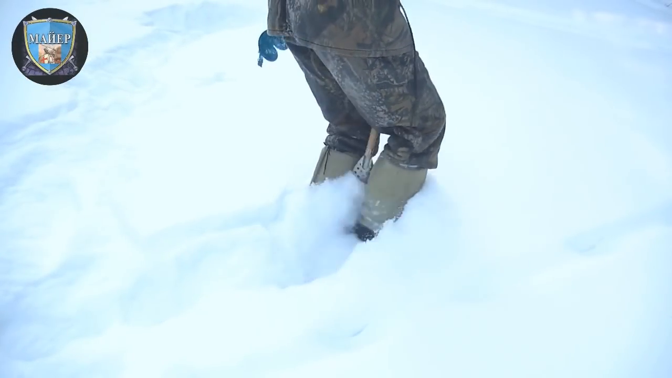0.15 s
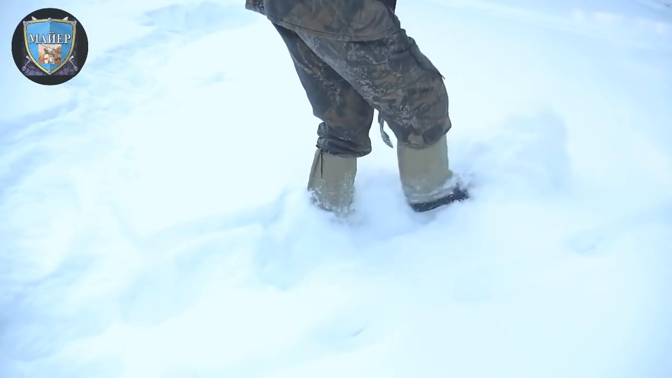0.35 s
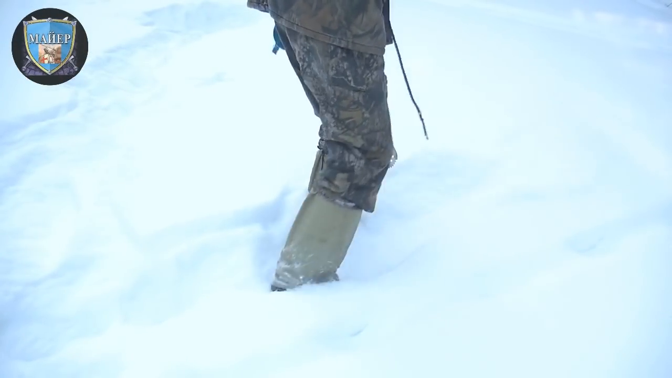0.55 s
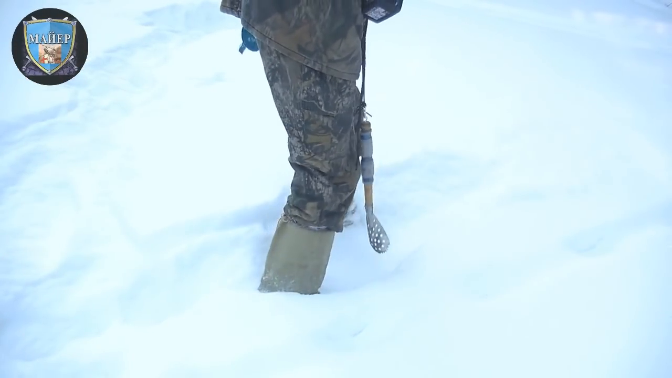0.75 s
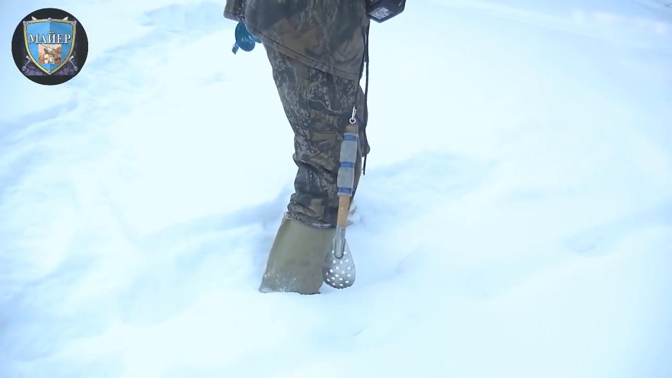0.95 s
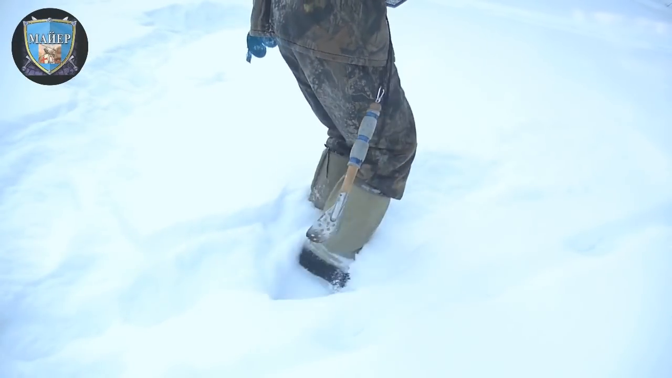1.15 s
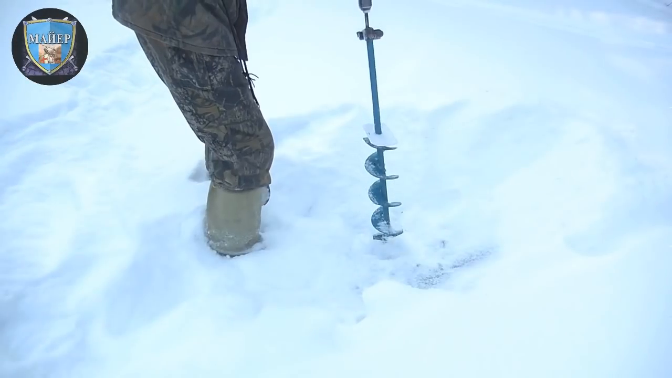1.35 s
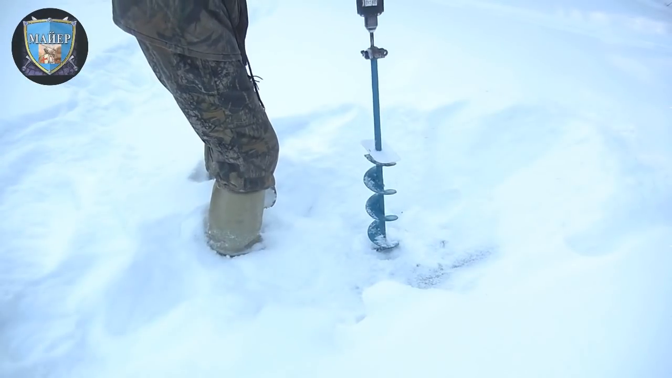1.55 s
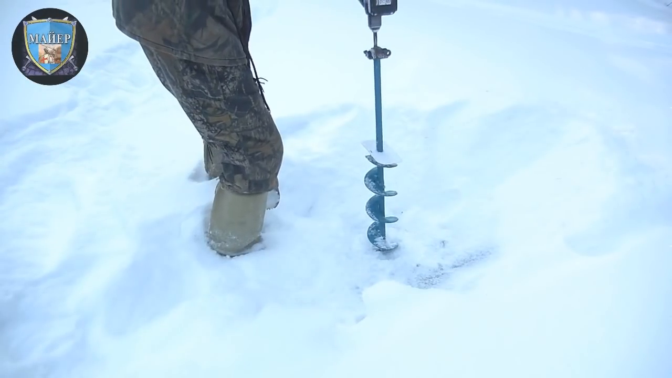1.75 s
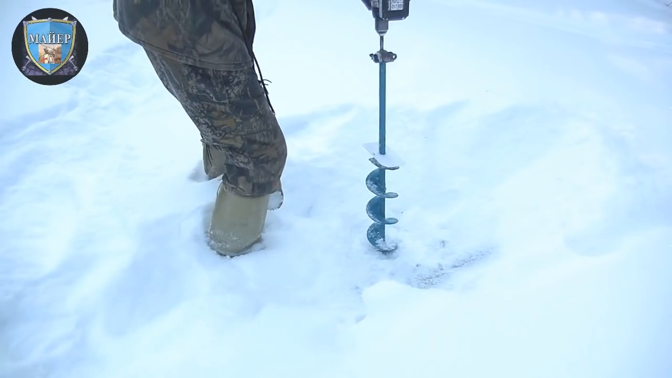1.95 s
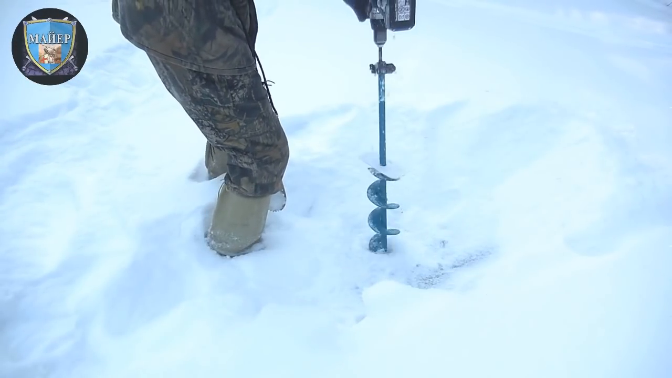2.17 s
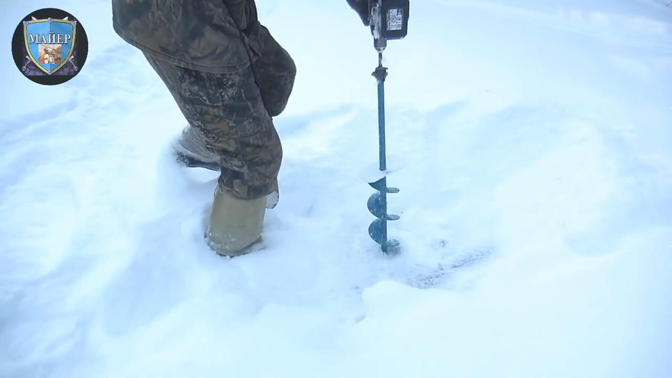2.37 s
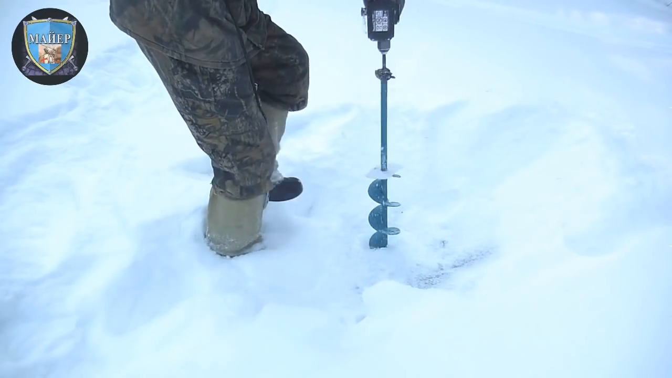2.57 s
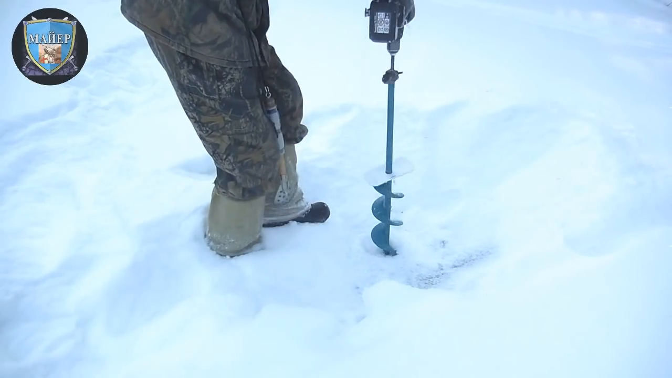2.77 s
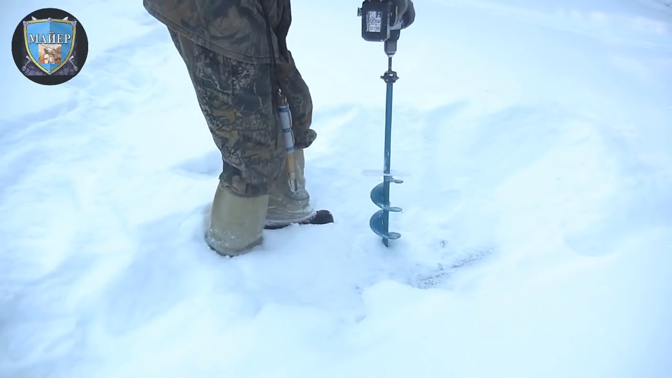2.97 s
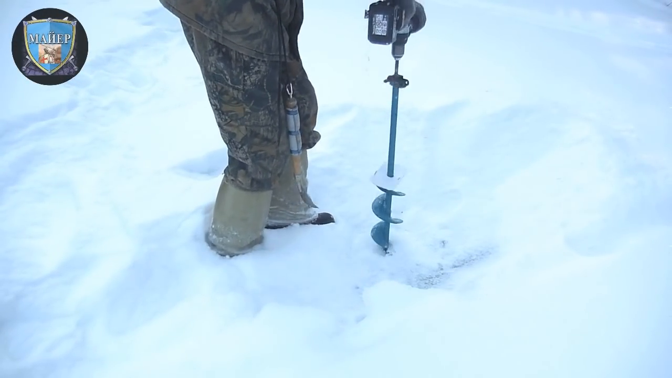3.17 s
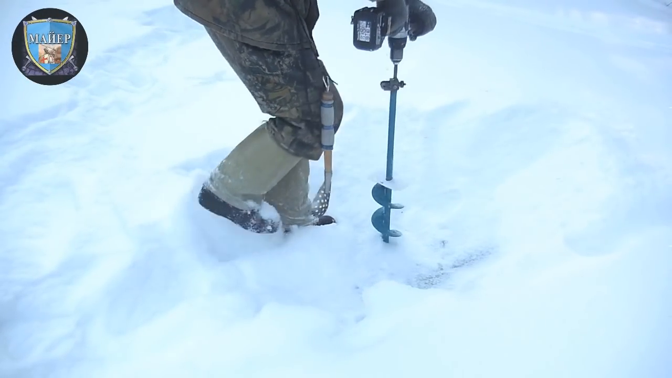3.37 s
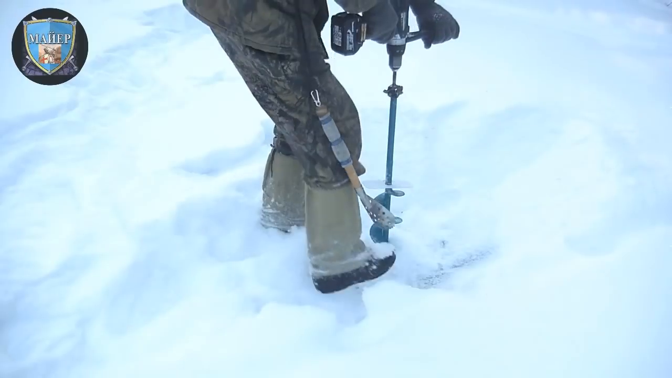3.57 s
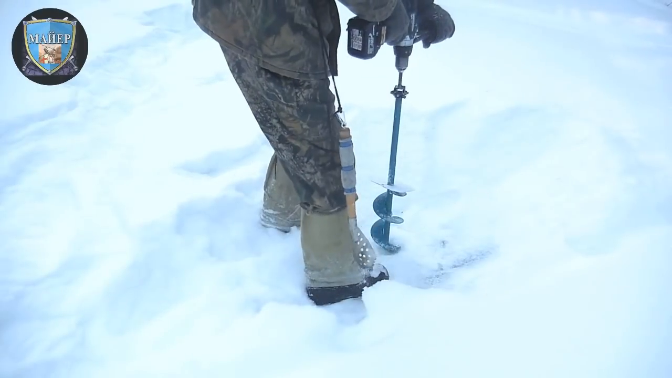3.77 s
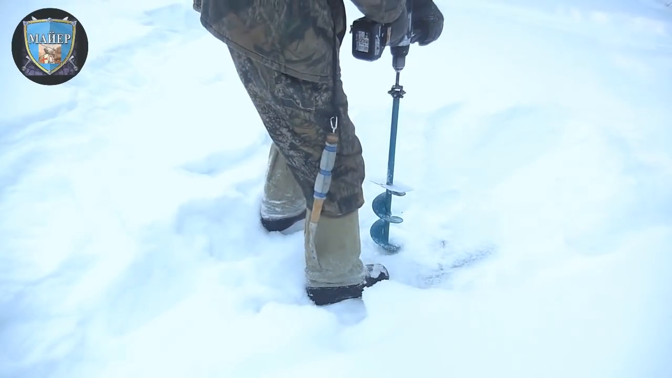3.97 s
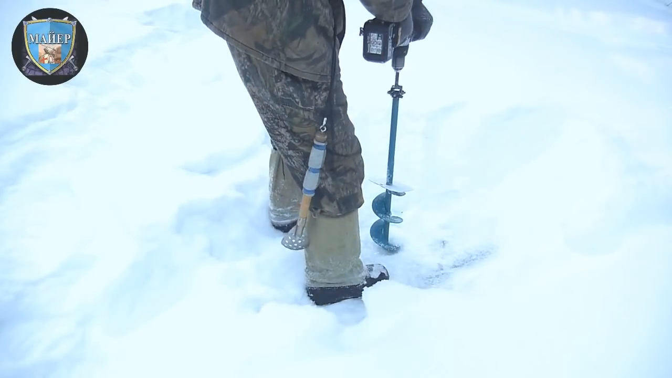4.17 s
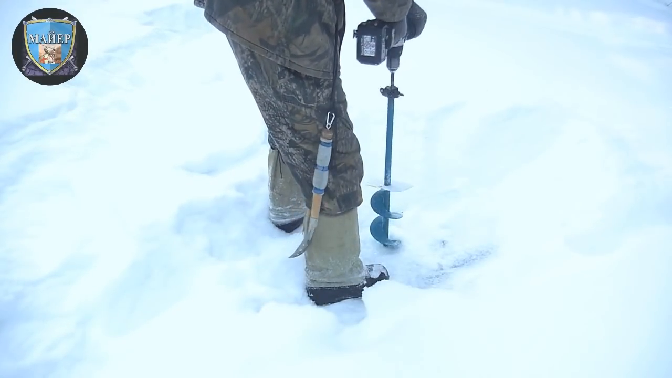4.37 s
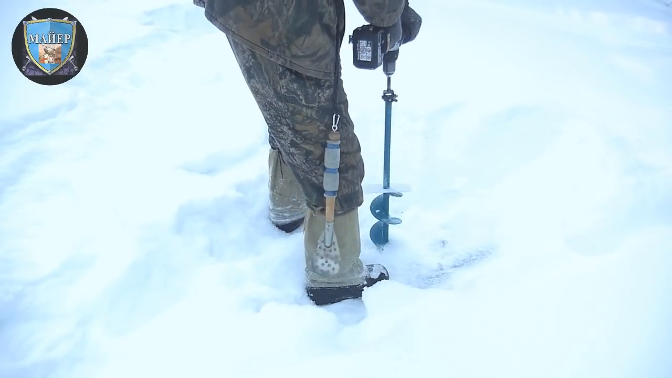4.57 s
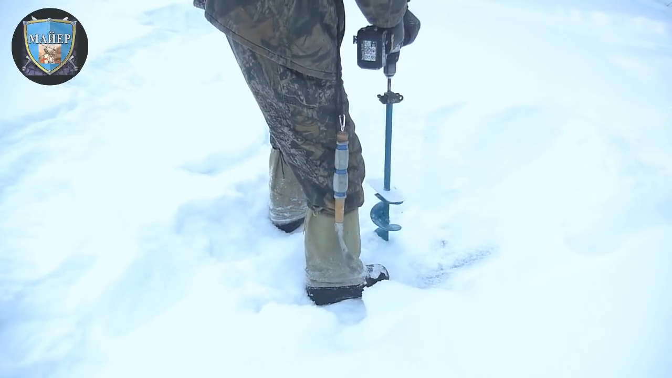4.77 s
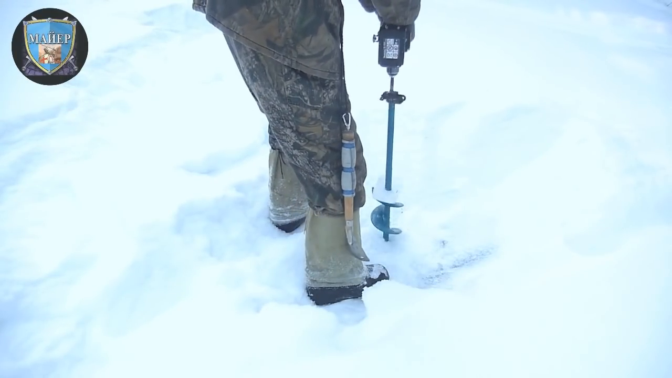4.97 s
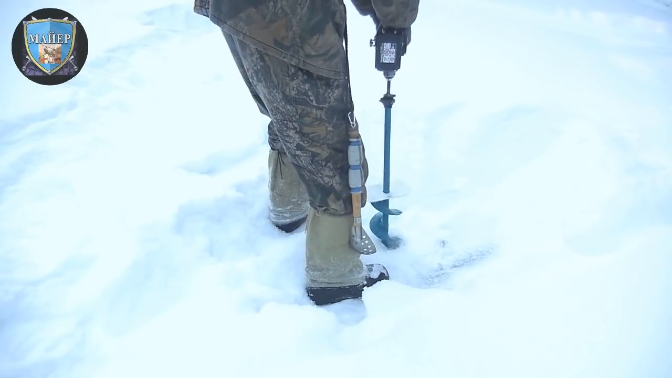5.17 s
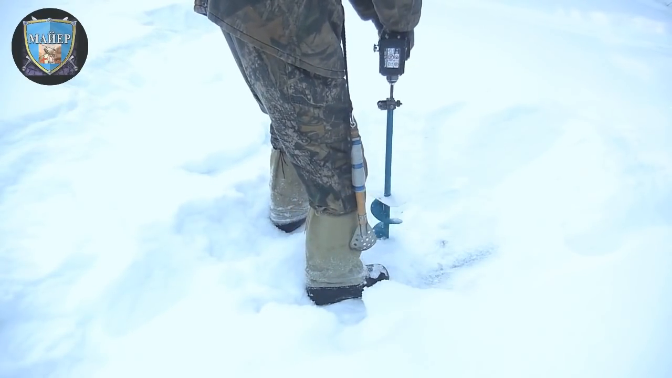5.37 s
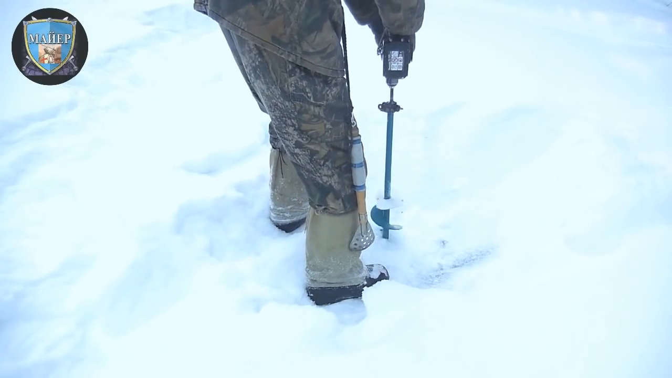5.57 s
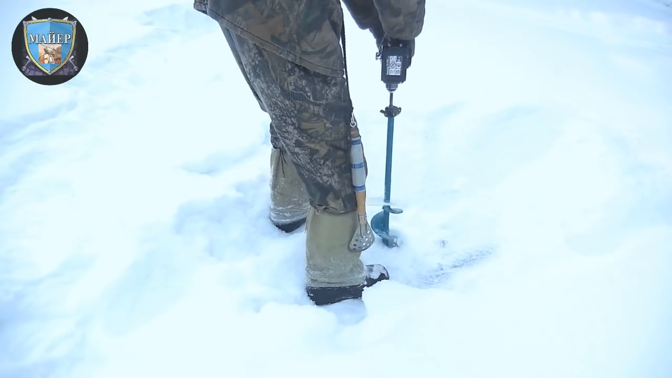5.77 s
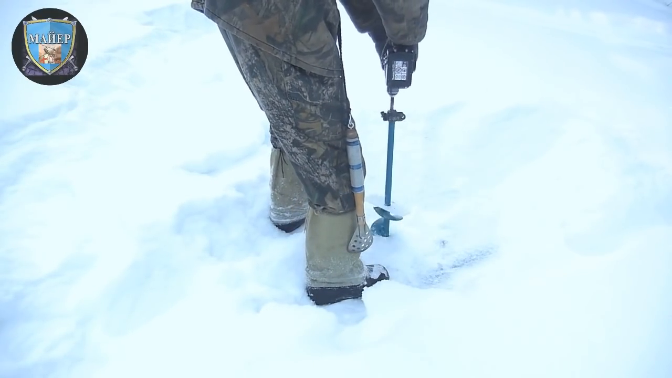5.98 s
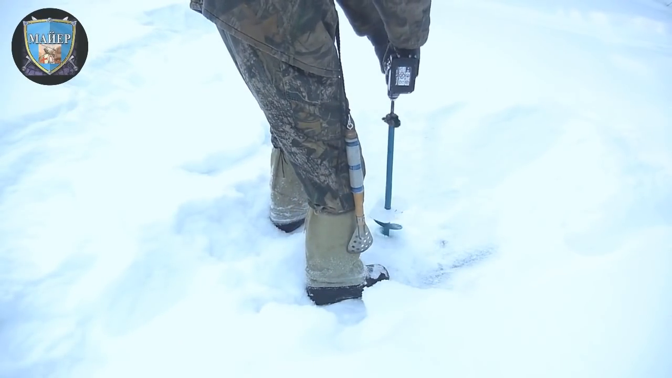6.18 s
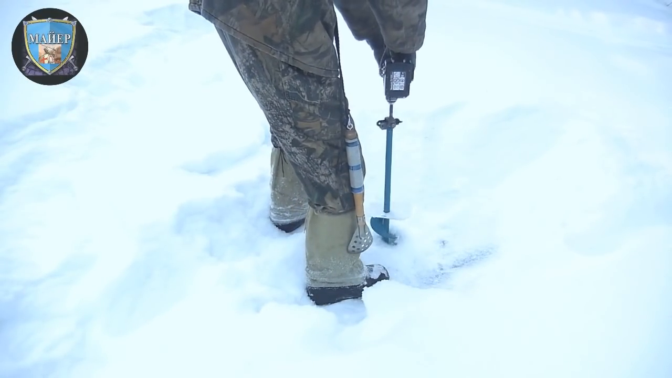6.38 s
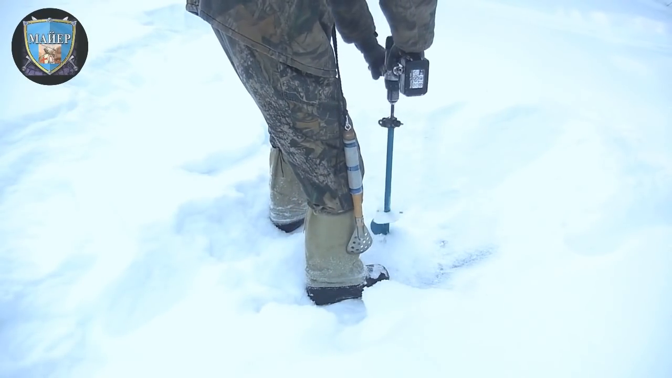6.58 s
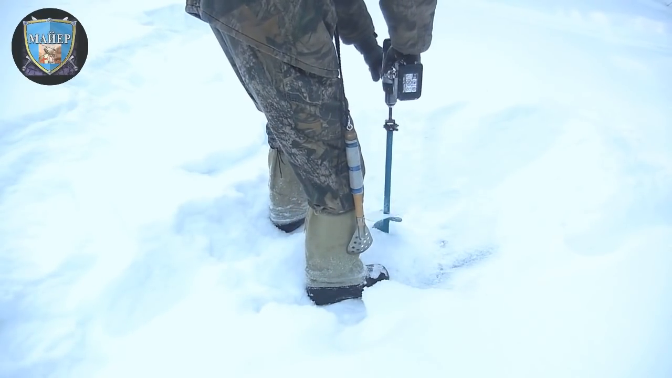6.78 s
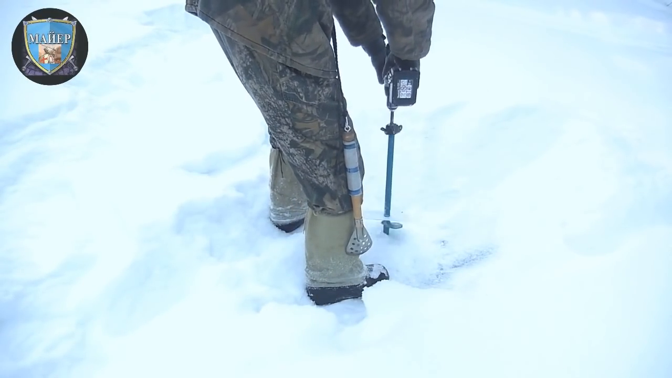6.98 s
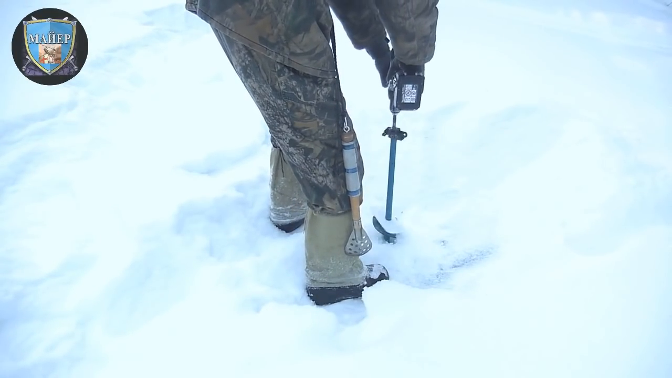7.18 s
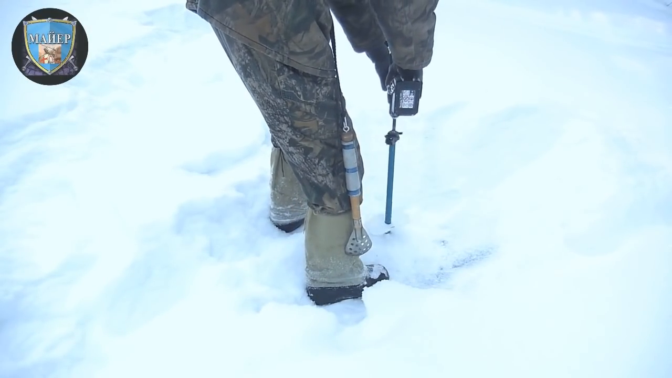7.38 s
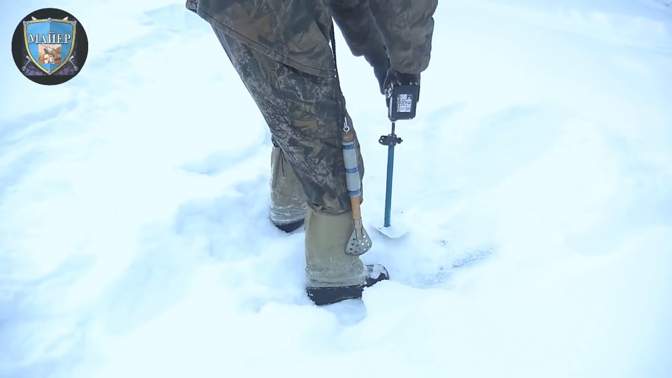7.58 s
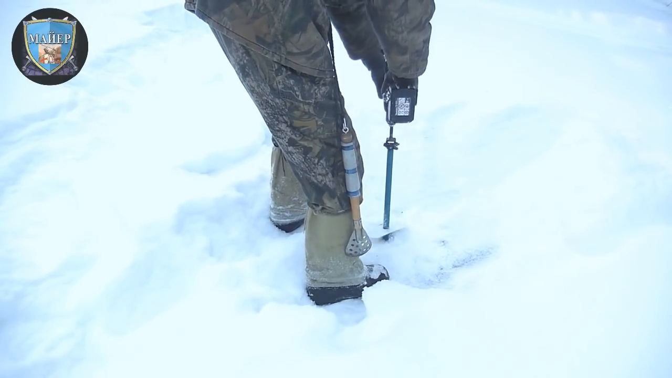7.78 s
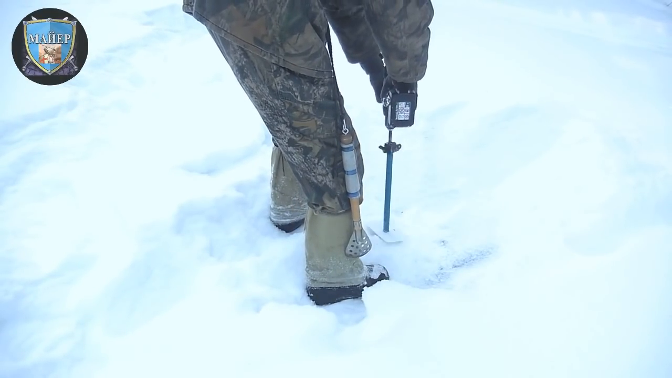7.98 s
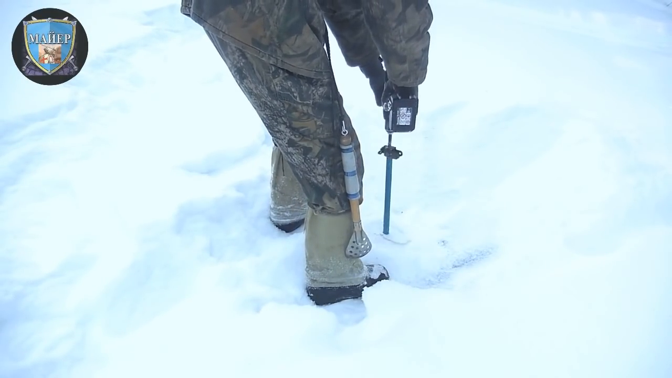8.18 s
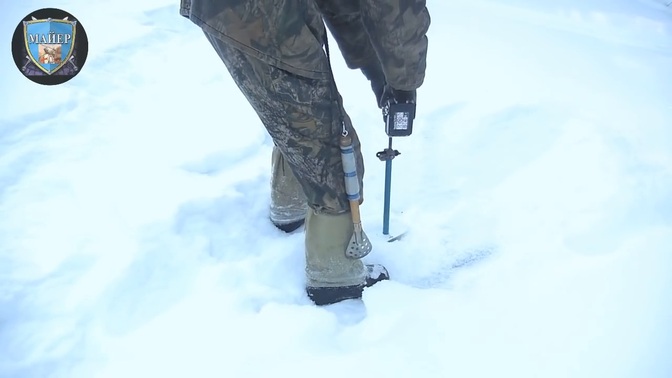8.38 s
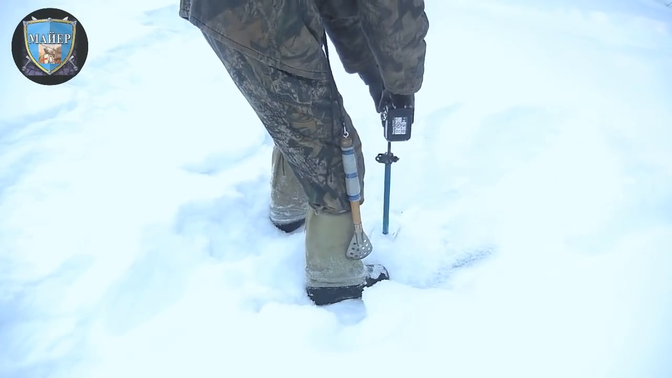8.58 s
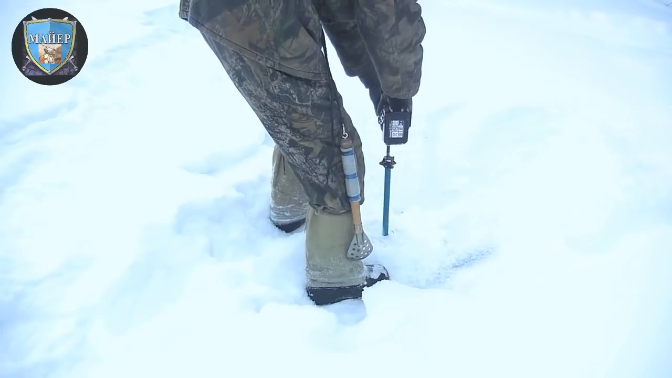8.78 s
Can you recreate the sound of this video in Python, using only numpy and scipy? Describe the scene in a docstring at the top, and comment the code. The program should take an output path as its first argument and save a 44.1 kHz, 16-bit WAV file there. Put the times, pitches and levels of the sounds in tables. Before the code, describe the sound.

Close by on a frozen lake, in stereo and with no echo, boots wade through soft snow and tackle clinks once. An ice auger on a cordless drill then cuts in two runs, one short and one long, split by a few crunching steps. Motor whine mixes with rough scraping, brief squeals, dry knocks, rattling steel and a hissing spray of ice. Toward the end the cutting smooths out and loose shavings churn with a deepening hollow note.

```python
"""An ice auger, driven by a cordless drill, bores twice into a frozen lake. Its blades chatter and squeal
on the ice and ring the steel spiral, chips spray, the motor whines, and loose shavings churn with a
hollow note that sinks as the hole deepens. Before that, a man wades a few steps through deep snow,
his tackle clinks and he sets the auger down. All is close by, in stereo, in open air with no echo."""
import sys
import numpy as np
from scipy import signal
from scipy.fft import rfft, irfft, next_fast_len
from scipy.io import wavfile
from scipy.ndimage import uniform_filter1d

SR = 44100
rng = np.random.default_rng(int(sys.argv[2]) if len(sys.argv) > 2 else 0)


def to_wav(sig):
    """Store sig (one row per channel, or 1-D mono) as 16-bit WAV at the path in sys.argv[1].

    Samples outside -1..1 are clipped; the rate is SR.
    """
    pcm = np.clip(np.atleast_2d(sig), -1, 1) * 32767
    pcm = np.round(pcm).astype(np.int16)
    wavfile.write(sys.argv[1], SR, pcm.T)  # frames by channels


N = 389844
TIME = np.arange(N) / SR
FFT_SIZE = next_fast_len(N, True)
FREQ = np.fft.rfftfreq(FFT_SIZE, 1 / SR) + 1e-3
FULL_LOAD_DB, FULL_CHIPS_DB = -30, -26
# The bright hiss of fine snow and cracking crust. Each row: frequency in Hz, level in dB.
POWDER_TONE = [(150, -55), (2000, -5), (4500, -2), (7000, 1.5), (11000, 0.5), (16000, -3.5)]


def drilling(sink_m_per_s=0.097):
    """The auger sinks while it turns; load and depth shape both the cutting and the motor."""
    # Each row: start in seconds, stop in seconds, pitch of the blades' squeal in Hz.
    borings = [(2.017, 3.664, 1900), (4.384, 8.9, 2365)]
    # One list per boring. Each row: time in seconds, load on the blades in dB, chips thrown in dB.
    work = [
        [(2.01, -41, -37.5), (2.028, -45, -28.5), (2.328, -40, -31.5), (2.346, -49, -31), (2.378, -31, -24.5),
         (2.452, -32.5, -31), (2.472, -43.5, -30.5), (2.526, -34.5, -29.5), (2.902, -32.5, -30.5),
         (2.976, -27.5, -25.5), (3.078, -31.5, -24.5), (3.28, -27, -26.5), (3.442, -30.5, -26.5),
         (3.618, -27.5, -26), (3.67, -33, -28)],
        [(4.38, -37, -35), (4.43, -32, -23), (4.78, -28.5, -24.5), (4.79, -34, -22), (5.01, -35.5, -26.5),
         (5.04, -40.5, -26), (5.07, -32.5, -25), (5.1, -42, -27.5), (5.2, -29.5, -27.5), (5.66, -30.5, -26),
         (5.78, -26.5, -27.5), (5.83, -32, -26.5), (5.95, -31, -27.5), (6.44, -32, -28), (6.45, -29, -26),
         (6.66, -46.5, -28), (7.03, -30.5, -27), (7.19, -32.5, -28.5), (8.0, -34.5, -30), (8.09, -35.5, -29.5),
         (8.72, -33.5, -30), (8.76, -35, -29.5)],
    ]
    running = sum(during(start, stop) for start, stop, _ in borings)
    squeal_hz, = curves([(s, hz) for start, stop, hz in borings for s in (start, stop)])
    load_db, chips_db = curves(np.vstack(work))
    depth_m = sink_m_per_s * np.cumsum(running) / SR
    return running * (auger(load_db, chips_db, depth_m, squeal_hz) + motor(load_db, depth_m))


def auger(load_db, chips_db, depth_m, squeal_hz, rough_ice_m=0.42):
    """The blades bite unevenly in the rough top ice and more smoothly further down."""
    uneven_db = 2 * np.exp(-depth_m / rough_ice_m)
    bite = gain(uneven_db * (0.64 * walk(90) + 0.33 * walk(220)))  # slow grabs and fast judder
    bite = bite / np.sqrt(uniform_filter1d(bite ** 2, SR // 12))  # keep the average power steady
    flake_db = 1.3 + uneven_db  # an uneven bite breaks off larger flakes that differ more in tone
    squeal_db = follow(load_db, depth_m, base_db=0, per_load=0.61, db_per_m=-6)
    cutting = blades(bite, flake_db, squeal_hz, squeal_db)
    rattling = steel_spiral(bite, load_db, depth_m)
    spraying = chips(bite, flake_db, squeal_db)
    churning = shavings(load_db, depth_m)
    cut_db = follow(load_db, depth_m, -22, 0.58, -5.5) + 0.53 * (chips_db - FULL_CHIPS_DB)
    rattle_db = follow(load_db, depth_m, -28.5, 1.08, -1.1) + .7 * walk(10)
    spray_db = follow(load_db, depth_m, 1.45, 0.064, -4) + chips_db
    churn_db = follow(load_db, depth_m, -54.5, 1, 30.6)
    return (gain(cut_db) * cutting + gain(rattle_db) * rattling
            + gain(spray_db) * spraying + gain(churn_db) * churning)


def blades(bite, flake_db, squeal_hz, squeal_db):
    """Breaking ice rings the blades and shaft, and their chatter makes a wavering squeal."""
    # The sound of the cut. Each row: frequency in Hz, level in dB.
    cut_tone = [(120, -80), (700, -62), (1300, -8), (1650, -4), (2700, -4), (3400, -3), (3800, -8),
                (4200, -5), (5500, -21), (9000, -27.5)]
    # How blades and shaft ring. Each row: pitch in Hz, width in Hz, level in dB.
    blade_rings = [(1950, 65, -0.5), (2160, 96, -2), (2500, 100, -12), (3330, 77, -6), (3585, 110, -7)]
    cracks = patchy(bite * unit(grains(5000, 1.6) + 0.69 * noise()), flake_db)
    cut = unit(colour(cracks, cut_tone, blade_rings))
    chatter_hz = squeal_hz * (1 + .03 * walk(60) + 0.027 * walk(5))
    squeal = ring(bite * noise(), chatter_hz, width_hz=350, order=3)
    squeal = squeal * gain(squeal_db + 1.9 * walk(45) - 5)
    notes, skidding = skids()
    # a skidding blade puts its power into the note instead of breaking ice
    return (cut + squeal) / np.sqrt(1 + skidding ** 2) + notes


def skids():
    """A blade sings briefly as it slides over hard ice. Returns the notes and their strength."""
    # Each row: loudest moment in seconds, half length in seconds, pitch in Hz, level in dB.
    slides = [(2.045, 0.018, 3220, 1.5), (2.185, 0.014, 1760, 4), (2.378, 0.017, 3100, 1),
              (2.56, 0.03, 1920, 0.5), (3.008, 0.0097, 1844, 2), (3.04, 0.02, 1895, 1),
              (3.44, .022, 2530, 0.5), (4.505, 0.026, 2450, 3.5), (4.69, .025, 2180, -0.5),
              (4.77, 0.044, 2550, -1.5), (5.0, 0.018, 2390, 2), (5.243, .03, 2100, -3.5),
              (6.86, .05, 2980, -2), (7.06, 0.025, 2150, -2)]
    notes, strength = np.zeros((2, N))
    waver, window = 1 + 0.075 * walk(400), SR // 4
    for s, half_s, hz, db in slides:
        start = int(s * SR) - window // 2
        span = slice(start, start + window)
        swell = gain(db) * np.exp(-((TIME[span] - s) / half_s) ** 2)
        notes[span] += swell * np.sqrt(2) * np.sin(2 * np.pi * hz * np.cumsum(waver[span]) / SR)
        strength[span] += swell
    return np.outer([1, .2], notes * gain(4.1 * walk(250))), strength


def steel_spiral(bite, load_db, depth_m, damping_db_per_m=11.5):
    """The cutting rattles and rings the spiral; snow in the hole damps its higher notes."""
    # The rattle. Each row: frequency in Hz, level in dB.
    rattle_tone = [(40, -71), (150, -56), (300, -23), (480, -19.5), (700, -7.5), (1000, -1.5), (1450, -7),
                   (2000, -13), (4000, -36)]
    # How the steel rings. Each row: pitch in Hz, width in Hz, level in dB.
    steel_rings = [(612.6, 45.6, -0.5), (825, 77, 3), (1194, 137, 0)]
    rattle = unit(colour(bite * grains(6000, 2.4), rattle_tone))
    blows = bite * grains(6000, 2.9)
    ringing = 0
    for note in steel_rings:
        octaves_up = np.log2(note[0] / steel_rings[0][0])
        ringing += colour(blows, rings=[note]) * gain(-damping_db_per_m * depth_m * octaves_up ** 2)
    ringing = unit(ringing * gain(1.86 * walk(16)))
    share = gain(follow(load_db, depth_m, 1.5, .35, 13))
    return (rattle + share * ringing) / np.sqrt(1 + share ** 2)


def chips(bite, flake_db, squeal_db):
    """Ice chips fly off in a hissing spray, and some squeak."""
    # Each row: frequency in Hz, level in dB.
    spray_tone = [(150, -75), (2000, -12), (3800, -8), (4900, -0.5), (5600, -2.5), (6300, -1), (8000, -3.5),
                  (10000, -4), (12000, -8), (16000, -12.5)]
    flakes = patchy(bite * unit(grains(7000, 2.2) + noise()), flake_db)
    spray = unit(colour(flakes, spray_tone))
    return spray + np.outer([1, .25], bite * squeaks() * gain(squeal_db - 6))


def squeaks(count=3500, low_hz=2400, high_hz=10000, half_s=0.0057):
    """Chips squeak for a few milliseconds on the steel, each at its own pitch."""
    swarm = np.zeros(N + SR)
    t = np.arange(-SR // 40, SR // 40) / SR
    for when, pitch, length, size in rng.random((count, 4)):
        hz = low_hz * (high_hz / low_hz) ** pitch
        start = int(when * N)
        swell = size ** 2 * np.exp(-(t / (half_s * (.5 + length))) ** 2)
        swarm[start:start + len(t)] += swell * np.sin(2 * np.pi * hz * t)
    return unit(swarm[:N])


def shavings(load_db, depth_m, snow_depth_m=0.13):
    """Loose shavings churn, and the air in the hole rings lower as the hole deepens."""
    # The churning. Each row: frequency in Hz, level in dB.
    churn_tone = [(30, -48), (100, -16), (190, -6), (280, 2), (380, 6.5), (520, 4.5), (900, 2.5),
                  (2000, -47)]
    # The hollow note's tone, with deep bass and treble cut away. Each row: frequency in Hz, level in dB.
    hollow_tone = [(25, -40), (60, -22), (105, -1.5), (600, 6), (1500, -20)]
    hole_hz = 343 / (4 * (snow_depth_m + depth_m))  # a quarter of a sound wave fits in the hole
    hollow = colour(ring(grains(1500, 7.2), hole_hz, width_hz=88), hollow_tone)
    churn = unit(colour(grains(1500, 1.4), churn_tone))
    return churn + hollow * gain(follow(load_db, depth_m, -18, .1, 10.3))


def motor(load_db, depth_m):
    """The drill's brushes and gears whine at multiples of its slightly shaky speed."""
    # The motor races where the blades lose grip. Each row: time in seconds, turns per second.
    speeds = [(2.0, 440), (2.2, 458), (2.45, 375), (2.82, 390), (2.95, 350), (3.66, 338), (4.38, 370),
              (4.8, 355), (5.11, 430), (5.28, 342), (6.1, 351), (6.45, 347), (6.7, 390), (6.86, 358),
              (6.96, 366), (7.08, 346), (8.1, 350), (8.84, 346)]
    # Each row in both: multiple of the motor speed, level in dB, phase wobble in radians.
    brush_tones = [(7, 3, .35), (14, -6, 1.3), (22, -1, .7)]
    gear_tones = [(15, -1.5, 1.4), (27.6, -2.5, 1.4)]
    speed_hz, = curves(speeds)
    angle = 2 * np.pi * np.cumsum(speed_hz * (1 + .007 * walk(16))) / SR

    def tones(table):
        """Each tone flutters in level and phase."""
        return sum(gain(db + 2 * walk(45)) * np.sin(multiple * angle + wobble * walk(200))
                   for multiple, db, wobble in table)

    whine_db, gear_db = follow(load_db, depth_m, -42, 0, 7), follow(load_db, depth_m, -3, .35, 14)
    whine = tones(brush_tones) + gain(gear_db) * tones(gear_tones)
    return np.outer([1, .1], whine * gain(whine_db))


def knocks():
    """Boots, shaft and catching blades knock dryly, each with a crack of ice or crust on top."""
    # Each row: start in seconds, level in dB, seconds to fade by 60 dB, dB added for the crack.
    hits = [(0.831, -27.5, 0.064, -16), (0.861, -33, 0.037, -16), (1.505, -36.5, 0.04, -1),
            (1.684, -53, .03, -13), (1.993, -29, .05, -16), (2.371, -12, .05, -20),
            (2.797, -4, 0.021, -5.5), (3.747, -22.5, .03, -12), (3.952, -32, 0.024, -32),
            (4.351, -9.5, 0.021, -12), (4.378, -10, 0.019, -18)]
    # The body of a knock. Each row: frequency in Hz, level in dB.
    knock_tone = [(80, -57), (300, -17), (800, -3.5), (1600, 0.5), (3300, -3), (5000, -9), (12000, -26)]
    blow, crack = np.zeros((2, N))
    for s, db, fade_s, crack_db in hits:
        start = int(s * SR)
        fall = gain(db - 60 * np.minimum(TIME[:N - start] / fade_s, 4))
        blow[start:] += fall
        crack[start:] += fall * gain(crack_db)
    body = gain(-2) * colour(blow * noise(), knock_tone)
    return body + gain(-4) * colour(crack * noise(), POWDER_TONE)


def footsteps(swell_curve=1.39):
    """Soft snow packs in a swarm of tiny crunches while powder hisses along boots and cloth."""
    # Each row: start, rise, hold and fall in seconds, level in dB, dB added for the powder.
    strides = [ (-.15, 0.32, .07, .06, -47.5, -10), (0.074, 0.17, 0.018, 0.064, -46.5, 0.5),
               (0.246, 0.053, 0.047, .08, -55, 4.5), (.33, .08, 0.21, 0.18, -72, 13),
               (0.577, 0.056, 0.13, 0.052, -42.5, -10), (0.82, .012, 0.077, 0.015, -60.5, 11),
               (1.004, .21, .02, 0.044, -43.5, -6), (1.471, 0.11, .005, 0.092, -50, 8),
               (1.737, 0.085, .01, 0.041, -53.5, 4.5), (1.861, 0.051, 0.013, 0.047, -45, 1),
               (3.663, 0.03, 0.031, 0.063, -43.5, -6), (3.76, .02, .01, .03, -49.5, -9),
               (3.76, 0.026, 0.15, 0.24, -62.5, -2), (3.964, 0.16, .14, .1, -58.5, -2),
               (4.294, 0.052, 0.023, .02, -42, -16), ]
    # The crunch. Each row: frequency in Hz, level in dB.
    snow_tone = [(40, -30), (150, -20.5), (300, -11.5), (600, -6), (1100, 0.5), (2200, 0), (4200, -1),
                 (6000, -11.5), (12000, -18)]
    packing, brushing = np.zeros((2, N))
    for s, rise_s, hold_s, fall_s, db, powder_db in strides:
        rise, fall = (TIME - s) / rise_s, 1 - (TIME - s - rise_s - hold_s) / fall_s
        swell = gain(db) * np.clip(np.minimum(rise, fall), 0, 1) ** swell_curve
        packing += swell
        brushing += swell * gain(powder_db)
    crunch = unit(colour(unit(grains(3500, 2.9) + 1.25 * noise()), snow_tone))
    powder = unit(colour(unit(grains(5000, 4.6) + 1.1 * noise()), POWDER_TONE))
    return gain(-0.2 + 0.89 * walk(90)) * (packing * crunch + gain(3) * brushing * powder)


def tackle(start_s=.063, level_db=-33.5):
    """A piece of metal on the belt clinks once and is damped by the cloth."""
    # Each row: pitch in Hz, level in dB, seconds to fade by 60 dB.
    metal_rings = [(2420, -2, .028), (3480, -9, .02), (6900, -9, .015), (13000, -12, .012)]
    age = np.clip(TIME - start_s, 0, 1)
    return gain(level_db) * sum(gain(db - 60 * age / fade_s) * np.sin(2 * np.pi * hz * age)
                                for hz, db, fade_s in metal_rings)


def air(level_db=-60):
    """Quiet winter air, and a few soft puffs against the microphones."""
    # Each row: loudest moment in seconds, level in dB, half length in seconds.
    puffs = [(0.353, -56, .012), (0.391, -42, .006), (0.527, -48, .008), (0.58, -55, .03),
             (0.66, -58, 0.027), (0.8, -57, .012), (0.97, -58, .009), (1.203, -58, 0.0079)]
    # The steady hush and the low puffs. Each row in both: frequency in Hz, level in dB.
    air_tone = [(25, -15), (60, -19), (150, -20.5), (400, -9.5), (1200, -6.5), (3000, -9), (6000, -12),
                (15500, -16)]
    puff_tone = [(20, -9), (70, -5), (170, -7), (400, -28), (1000, -60)]
    swell = sum(gain(db) / (1 + ((TIME - s) / half_s) ** 4) for s, db, half_s in puffs)
    hush = gain(level_db) * unit(colour(noise(), air_tone))
    return hush + gain(-16) * swell * unit(colour(noise(), puff_tone))


def follow(load_db, depth_m, base_db, per_load, db_per_m):
    """A level in dB: base_db at full load on the surface, shifted by load and depth."""
    return base_db + per_load * (load_db - FULL_LOAD_DB) + db_per_m * depth_m


def gain(db):
    """Turn decibels into a multiplier."""
    return 10 ** (np.asarray(db) / 20)


def unit(x):
    """Scale to an average power of 1."""
    return x / np.sqrt(np.mean(x ** 2))


def curves(table):
    """The columns of a timed table, one value per sample."""
    s, *columns = np.transpose(table)
    return [np.interp(TIME, s, column) for column in columns]


def during(start, stop, fade_s=0.019):
    """1 from start to stop, with short fades to 0 outside."""
    return np.clip(np.minimum(TIME - start, stop - TIME) / fade_s + 1, 0, 1)


def across(points):
    """Join (Hz, value) points into a curve over all frequencies."""
    hz, value = np.transpose(points)
    return np.interp(np.log(FREQ), np.log(hz), value)


def colour(x, tone=None, rings=()):
    """Filter by a smooth tone curve, by ringing peaks, or by both."""
    power = 0 if tone is None else gain(across(tone)) ** 2
    for hz, width, db in rings:
        off_pitch = (FREQ ** 2 - hz ** 2) / (FREQ * width * np.sqrt(2))
        power = power + gain(db) ** 2 / (1 + off_pitch ** 2) ** 2
    return irfft(rfft(x, FFT_SIZE) * np.sqrt(power), FFT_SIZE)[..., :N]


def noise():
    """Two unrelated noises: the part left and right share, and the part in which they differ."""
    return rng.standard_normal((2, N))


def walk(rate):
    """Smooth random motion of typical size 1, with about rate turns a second."""
    points = rng.standard_normal(N // 8)
    path = np.interp(TIME * rate, np.arange(len(points)), points)
    return unit(uniform_filter1d(path, int(SR / rate / 2) + 1))


def grains(per_second, scatter_db):
    """Tiny cracks at random moments, of unequal size."""
    moments = rng.random(N) < per_second / SR
    return unit(moments * gain(scatter_db * rng.standard_normal(N)) * noise())


def patchy(x, flake_db):
    """Each flake breaks with its own tone: nearby frequencies swell together for some milliseconds."""
    _, s, spectrum = signal.stft(x, SR, nperseg=512)
    patches = rng.standard_normal(spectrum.shape[1:])
    for axis in (0, 1, 0, 1):  # blur over frequency and time
        patches = uniform_filter1d(patches, 3, axis=axis)
    boost = gain(np.interp(s, TIME, flake_db) * np.minimum(unit(patches), 2.5))
    boost = boost / np.sqrt(np.mean(boost ** 2, axis=0))
    return unit(signal.istft(spectrum * boost)[1][:, :N])


def ring(x, hz, width_hz, order=2):
    """Keep a narrow band of sound around a moving pitch."""
    turn = np.exp(2j * np.pi * np.cumsum(hz) / SR)
    lowpass = signal.butter(order, width_hz / 2, fs=SR, output="sos")
    return unit((signal.sosfilt(lowpass, x / turn) * turn).real)


def scene():
    """All sources reach two close microphones, alike in the bass and less so in the treble."""
    # Each row: frequency in Hz, how alike left and right are from 0 to 1.
    side_likeness = [(300, 1), (1000, 0.94), (2200, 0.82), (3100, 0.63), (6000, 0.99), (10000, 0.49),
                     (15000, 0.27)]
    # Each row: frequency in Hz, left level minus right level in dB.
    left_louder = [(300, -0.5), (1300, 1.7), (2400, -1), (4400, -5.5), (8000, 0.2), (15000, -6.5)]
    # Each row: frequency in Hz, how far the left wave is ahead in radians.
    left_ahead = [(300, 0.17), (1500, -0.28), (3700, -0.76), (5000, -0.52), (6600, 0), (9000, -0.83),
                  (12000, -1.07), (15500, -0.19)]
    shared, apart = rfft(drilling() + footsteps() + knocks() + tackle() + air(), FFT_SIZE)
    likeness = np.clip(across(side_likeness), 0, .995)
    sides = np.array([[1], [-1]])
    pair = shared + sides * apart * np.sqrt((1 - likeness) / (1 + likeness))
    balance = gain(sides * across(left_louder) / 2)
    timing = np.exp(1j * sides * across(left_ahead) / 2)
    return irfft(pair * balance * timing, FFT_SIZE)[:, :N]


def record(dry):
    """Cut away the highest treble."""
    top_hz = 15950
    return signal.sosfilt(signal.ellip(10, .2, 80, top_hz, fs=SR, output="sos"), dry)


dry = scene()
out = record(dry)
to_wav(out)
```